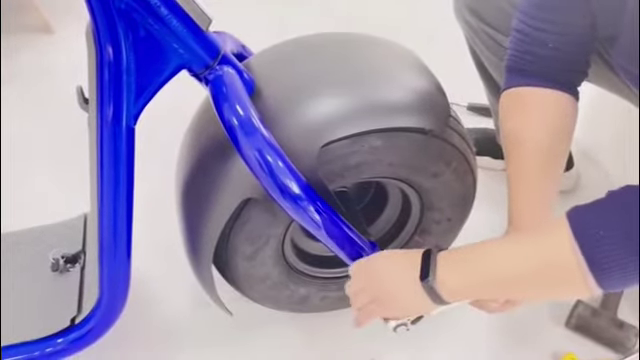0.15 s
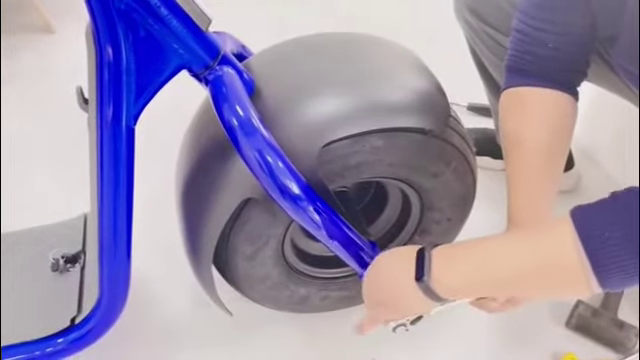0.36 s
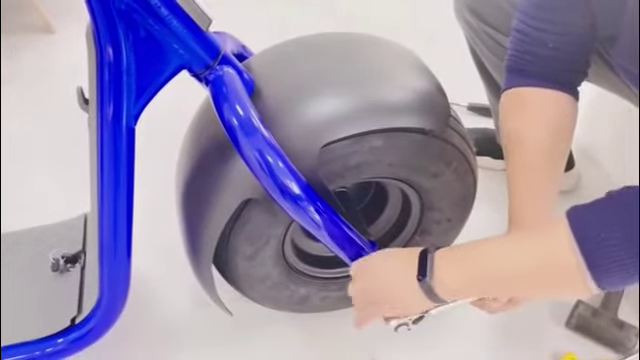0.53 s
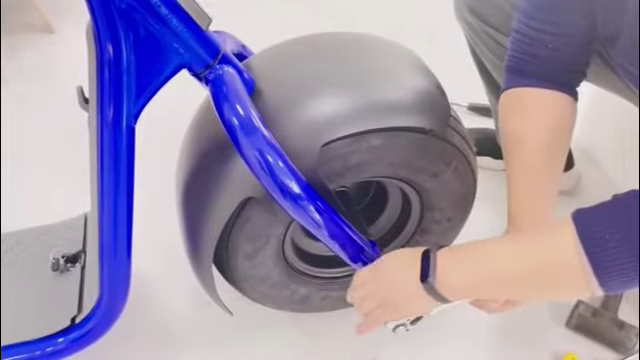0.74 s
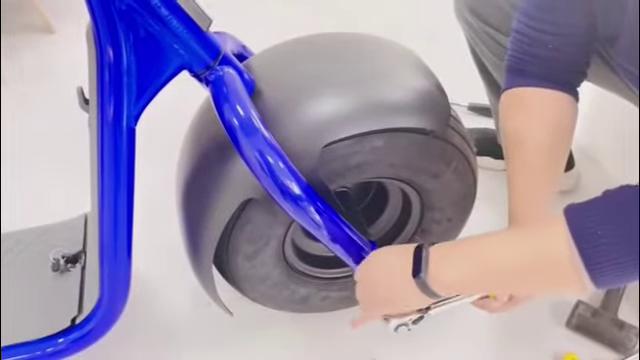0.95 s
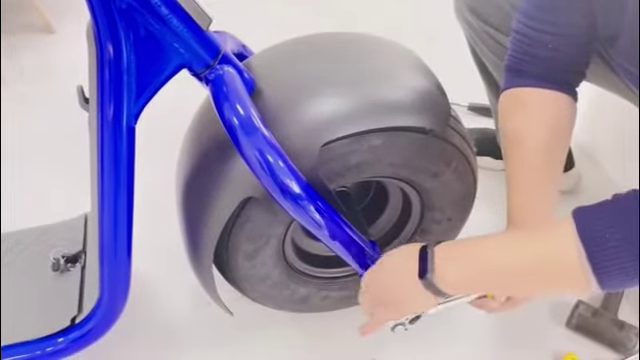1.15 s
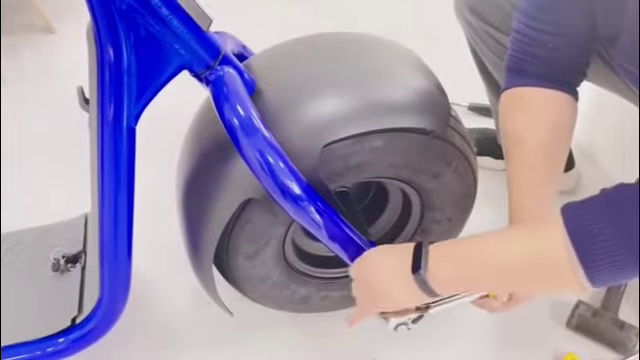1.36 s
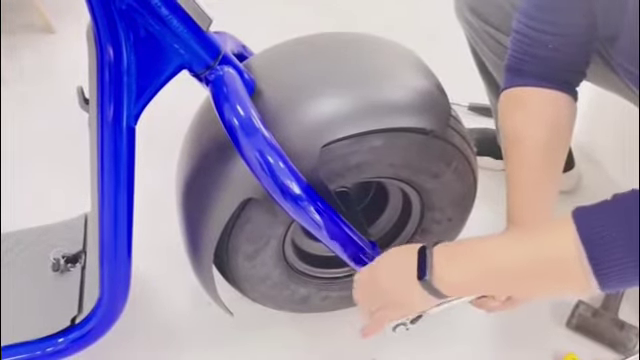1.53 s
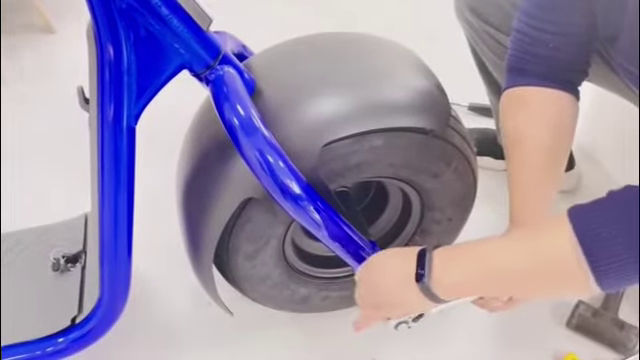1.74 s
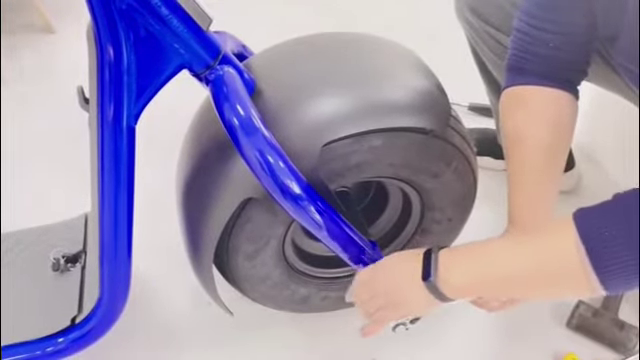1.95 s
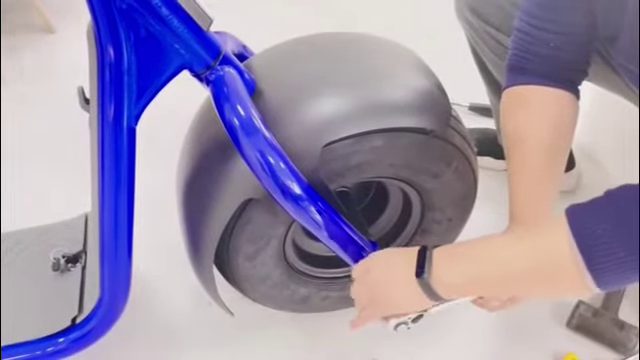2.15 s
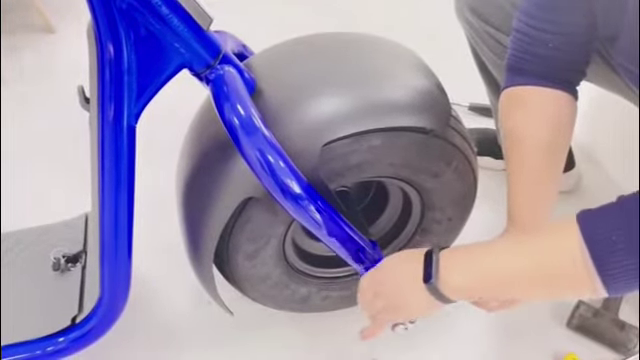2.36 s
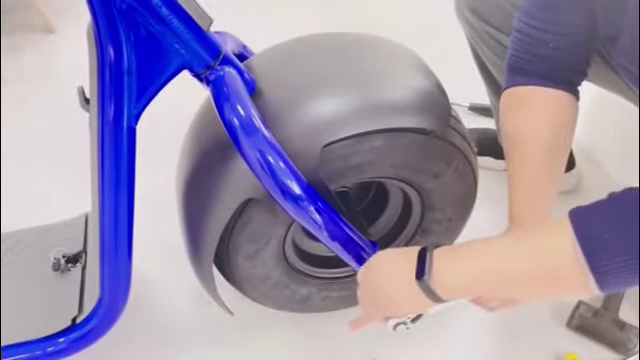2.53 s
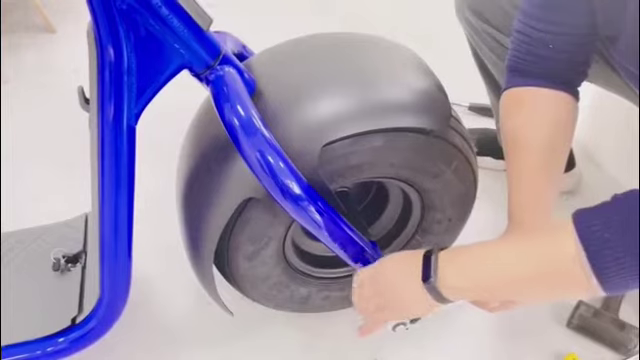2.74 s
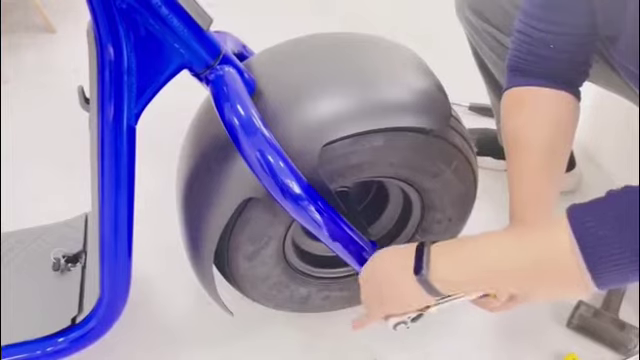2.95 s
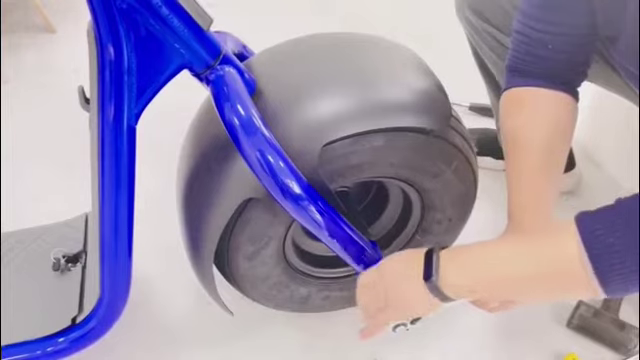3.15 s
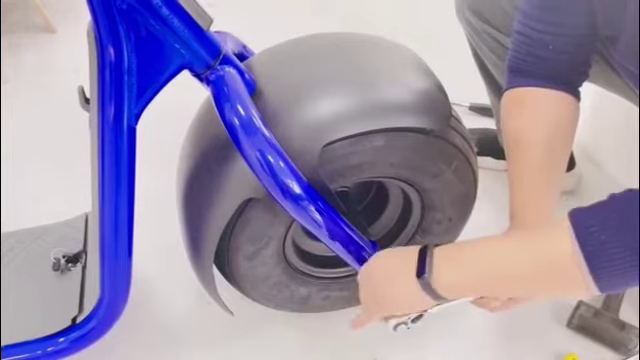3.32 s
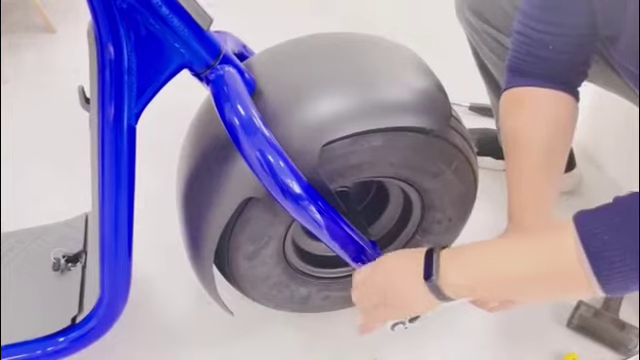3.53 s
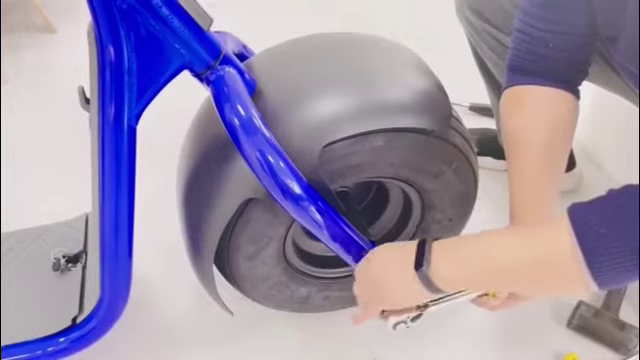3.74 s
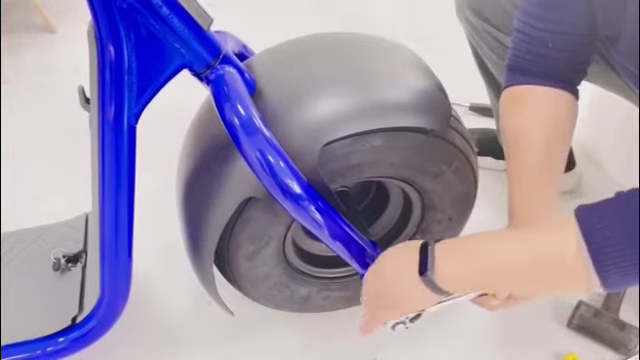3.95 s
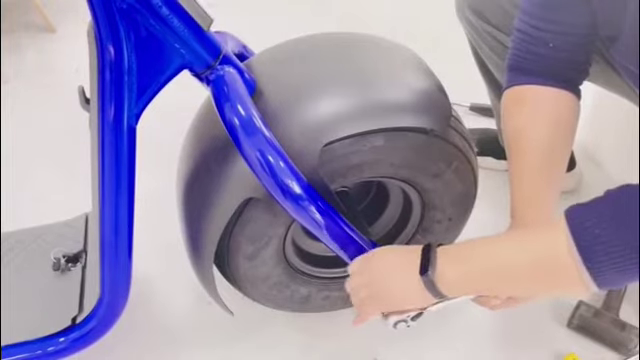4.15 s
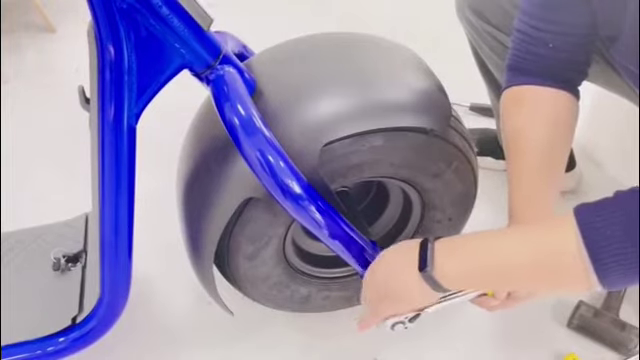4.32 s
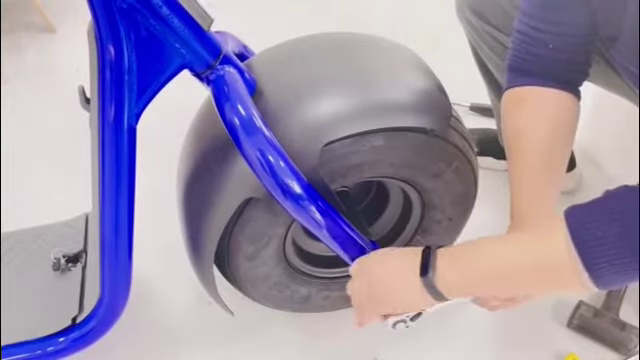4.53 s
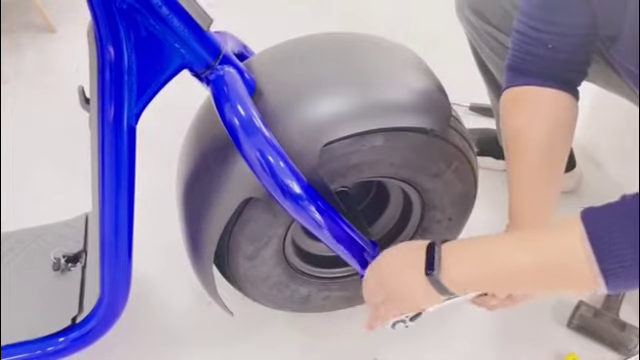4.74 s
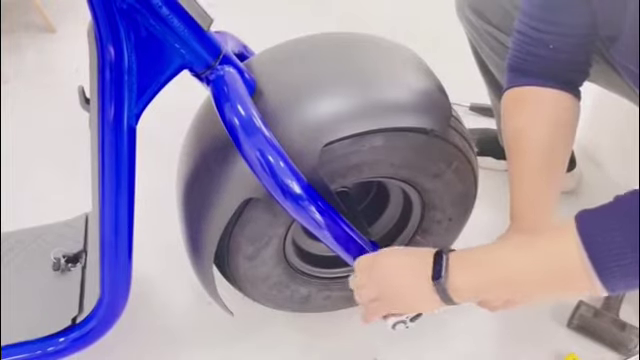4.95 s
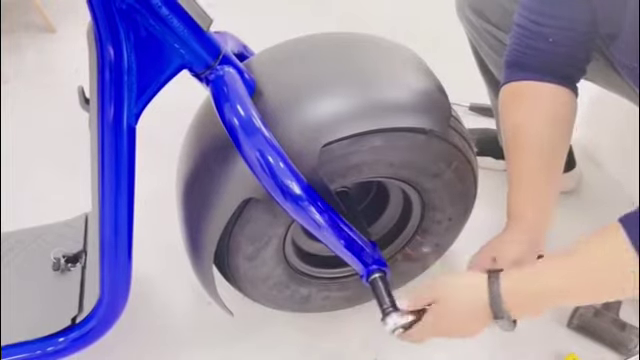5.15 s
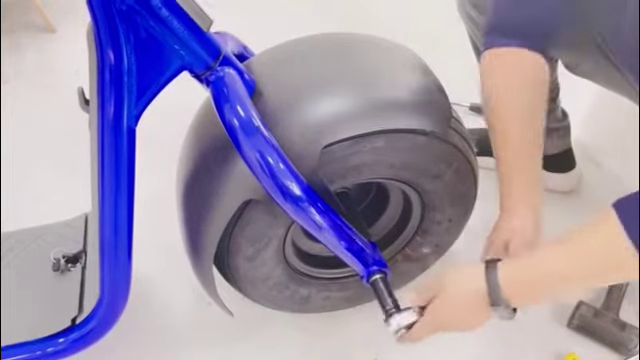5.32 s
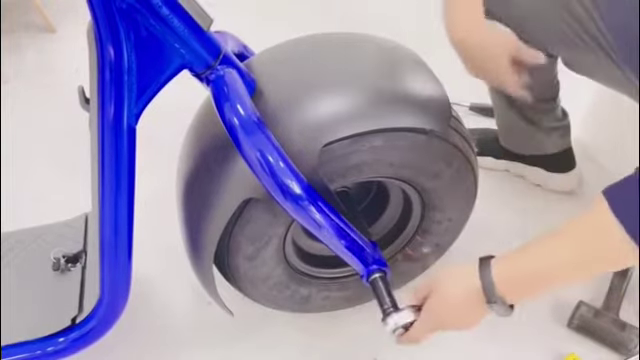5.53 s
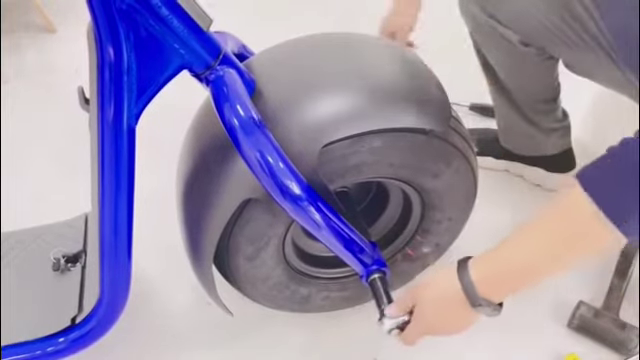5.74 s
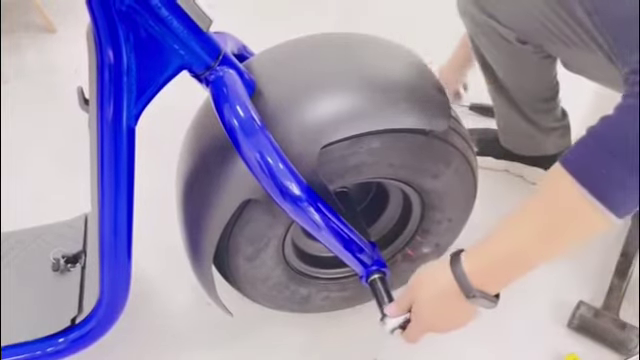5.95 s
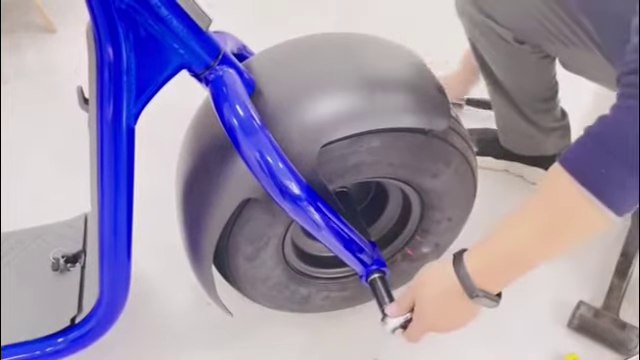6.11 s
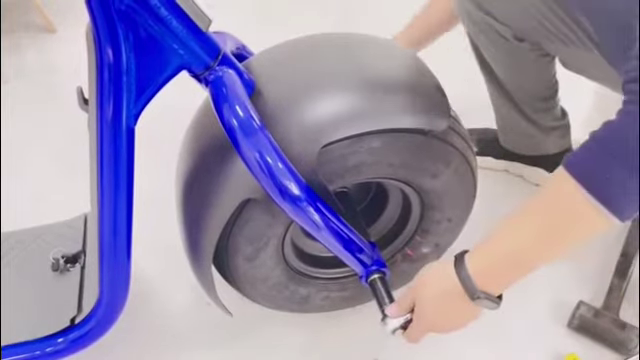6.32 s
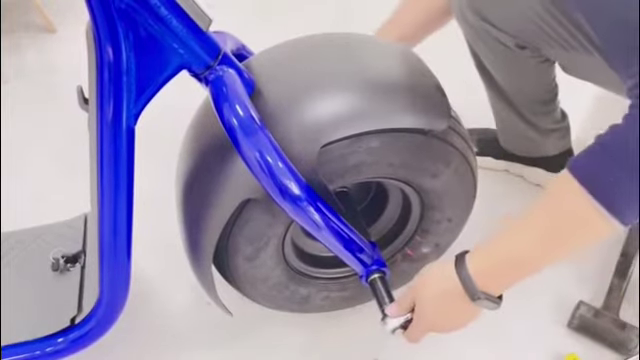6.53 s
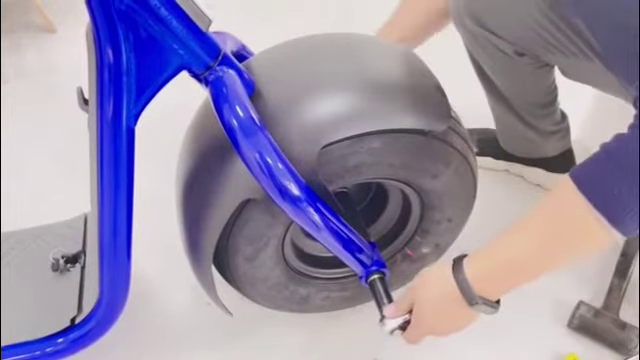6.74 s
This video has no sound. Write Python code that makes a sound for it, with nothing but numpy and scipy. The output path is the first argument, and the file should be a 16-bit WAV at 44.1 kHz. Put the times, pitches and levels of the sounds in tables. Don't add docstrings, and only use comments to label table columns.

```python
import sys
import numpy as np
from scipy import signal
from scipy.fft import rfft, irfft
from scipy.io import wavfile
from scipy.ndimage import uniform_filter1d

SR = 44100
rng = np.random.default_rng(int(sys.argv[2]) if len(sys.argv) > 2 else 0)


def makeup_ratio(level_db):
    decades = np.asarray(level_db, float) / 20
    return 10 ** decades


def log_audio(samples):
    frames = np.atleast_2d(samples).T
    limited = np.clip(frames, -1, 1)
    pcm = np.round(limited * 32767).astype(np.int16)
    wavfile.write(sys.argv[1], SR, pcm)


N = 303408
TIME = np.arange(N) / SR


def rms1(x):
    return x / np.sqrt(np.mean(x ** 2))


def on_log(table, hz):
    rows = np.array(table)
    return np.interp(np.log(np.maximum(hz, 1)), np.log(rows[:, 0]), rows[:, 1])


def band(x, lo_hz, hi_hz, order=2):
    edges = [lo_hz, min(hi_hz, .45 * SR)]
    return signal.sosfilt(signal.butter(order, edges, "band", fs=SR, output="sos"), x)


def pair(alike, size=N):
    mid, side = rng.standard_normal((2, size), dtype=np.float32)
    alike = np.clip(alike, 0, 1)
    opposite = np.array([[1], [-1]])
    return np.sqrt((1 + alike) / 2) * mid + np.sqrt((1 - alike) / 2) * side * opposite


def held_noise(hold):
    return np.repeat(rng.standard_normal(N // hold + 1), hold)[:N]


def patches(spread_db, hold=600):
    return makeup_ratio(spread_db * uniform_filter1d(held_noise(hold), size=150))


def strikes(times, db, rise_s, fall_s, lead_s):
    train = np.zeros(N)
    starts = ((times - lead_s) * SR).astype(int)
    np.add.at(train, np.clip(starts, 0, N - 1), makeup_ratio(db))
    t = TIME[:int(SR / 10)]
    swell = 1.3
    shape = np.exp(-t / fall_s) * (1 - np.exp(-(t / rise_s) ** swell))
    return np.maximum(signal.oaconvolve(train, shape / shape.max())[:N], 0)


def resonate(x, hz, width, wander):
    if not wander:
        return signal.lfilter(*signal.iirpeak(hz, hz / width, SR), x)
    pitch = hz * patches(20 / np.log(10) * wander, hold=500)
    turn = np.exp(2j * np.pi / SR * np.cumsum(pitch))
    keep = np.exp(-np.pi * width / SR)
    return 2 * (signal.lfilter([1 - keep], [1, -keep], x * turn.conj()) * turn).real


def body(push, modes, lo_hz, hi_hz, broad_db, alike, gains=(), wander=0):
    out = makeup_ratio(broad_db) * push * patches(1.36) * pair(alike)
    area = makeup_ratio(2 * broad_db) * (hi_hz - lo_hz)
    for k, (hz, width, db) in enumerate(modes):
        gain = gains[k] if k < len(gains) else 1
        drive = push * patches(2.2) * gain
        out = out + makeup_ratio(db) * resonate(drive * pair(alike), hz, width, wander)
        area += makeup_ratio(2 * db) * width * np.pi / 2
    return band(out, lo_hz, hi_hz, order=3) * np.sqrt(SR / 2 / area)


def rings(push, modes, clean=False):
    t = TIME[:SR // 2]
    tone = sum(makeup_ratio(db - 60 * t / t60) * np.sin(2 * np.pi * hz * t) for hz, db, t60 in modes)
    drive = push[None] if clean else push * pair(0.88)[:1]
    return signal.fftconvolve(drive, tone[None])[:, :N]


# (frequency [Hz], density [dB per Hz])
AIR_SPECTRUM = [(24, -36), (40, -2), (69, -1), (92, -3.5), (104, -6.5), (158, -11), (217, -15),
                (298, -16.5), (329, -19.5), (453, -27), (1620, -36), (2580, -38.5), (6240, -49),
                (9230, -53.5), (14000, -71)]


def air():
    hz = np.fft.rfftfreq(N, 1 / SR)
    colour = makeup_ratio(on_log(AIR_SPECTRUM, hz))
    mid, side = rfft(rng.standard_normal((2, N)))
    share = np.clip(hz / 800, 0, .8)
    rumble = makeup_ratio(-45) * rms1(irfft(colour * (mid + share * side * np.array([[1], [-1]])), N))
    whistle = makeup_ratio(-72.5) * patches(2.7, hold=2500) * rms1(band(pair(0.55), 2300, 2650))
    buzz = makeup_ratio(-62.0) * np.sin(2 * np.pi * 297 * TIME)
    hum = makeup_ratio(-55.0) * patches(2.1, hold=6900) * np.sin(2 * np.pi * 50 * TIME)
    return rumble + whistle + buzz + hum


# (time [s], level [dB])
RUSTLE = [
    (5.0, -104),
    (5.2, -66),
    (5.3, -85),
    (5.8, -80),
    (5.95, -60.5),
    (6.05, -65),
    (6.15, -63),
    (6.3, -69),
    (6.5, -76.5),
]


def cloth():
    grains = pair(0.38) * makeup_ratio(1.9 * rng.exponential(size=N))
    level = np.interp(TIME, *np.transpose(RUSTLE), left=-120, right=-120)
    return makeup_ratio(level) * patches(2.2, hold=1500) * rms1(band(grains, 1500, 12600))


# (centre [Hz], t60 [s], level [dB])
REVERB_BANDS = [(296, 0.72, -1), (820, 0.44, -4), (2720, 0.8, -22), (6500, 0.43, -10.5),
                (12800, 0.11, -34.5)]


def echoes():
    t = TIME[:int(.7 * SR)]
    tail = 0
    for hz, t60, db in REVERB_BANDS:
        noise = band(pair(0.36, size=len(t)), hz / 3.6, hz * 1.71)
        tail = tail + makeup_ratio(db - 60 * t / t60) * noise / np.sqrt(t60 * SR / 14)
    return tail * (1 - np.exp(-t / 0.0032))


def room(dry):
    blend_hz = 1.682
    turn, mono = np.pi * blend_hz * TIME, dry.mean(axis=0)[None]
    return sum(signal.fftconvolve(mono * share, echoes())[:, :N] for share in (np.cos(turn), np.sin(turn)))


# (time [s], level [dB], clank [dB], slap [dB], tick [dB])
TOOL_BLOWS = [
    (6.557, -13, -29, -15, -8),
    (6.653, -13, 0, -10, -9.5),
    (6.721, -34, 3.5, -6, -76),
    (6.735, -25.5, -11, -26, -31),
    (6.806, -50, 0, -9, -32),
    (6.832, -35.5, -6, -19, -25),
]
# (time [s], level [dB])
STEEL_TOUCHES = [
    (5.974, -36.5),
    (6.111, -30.5),
]
# (frequency [Hz], width [Hz], level [dB])
TOOL_MODES = [(610, 49, -7.5), (890, 70, -6), (1030, 42, -9), (1352, 57, -3.5), (1990, 110, -2),
              (2500, 260, -16), (2840, 820, -0.5), (4500, 450, -20)]
# (frequency [Hz], level [dB], t60 [s])
BLOW_RING = [(611, -41.5, 0.15), (626, -53, 0.12), (820, -35, 0.23), (890, -34, 0.2), (1100, -48, .13),
             (1130, -41, 0.14), (1410, -48, 0.16), (1660, -44, .07), (2330, -48, .06)]
# (frequency [Hz], level [dB], t60 [s])
EDGE_RING = [(1442, -27, 0.11), (1936, -28, 0.056), (2020, -37, .04), (2520, -42, .04), (3000, -38, .04)]
# (rise [s], fall [s], lead on the peak [s])
BLOW_SHAPE = (0.0003, 0.015, 0.00087)


def second_tool():
    s, db, clank_db, slap_db, tick_db = np.transpose(TOOL_BLOWS)
    low = body(strikes(s, db - 5.5, *BLOW_SHAPE), TOOL_MODES[:4], 510, 2300, -11.5, 0.72)
    low = low + rings(strikes(s, db, 0.00005, 0.0001, 0.00052), BLOW_RING, clean=True)
    edge = strikes(s, db + clank_db + 3.0, .0004, 0.012, .0005)
    clank = body(edge, TOOL_MODES[4:5], 1700, 2580, -11.0, 0.87) * makeup_ratio(-5.5)
    edge_tap = strikes(s, db + clank_db, 0.00003, 0.00006, 0.00064)
    clank = clank + rings(edge_tap, EDGE_RING, clean=True) * makeup_ratio(8)
    flat = strikes(s, db + slap_db + 8.5, 0.00019, 0.0073, 0.00086)
    slap = body(flat, TOOL_MODES[5:], 2500, 5800, -10.0, 0.37)
    tick = band(strikes(s, db + tick_db, 0.00016, 0.0033, 0.00082) * pair(0.6), 5200, 10700)
    thud = band(strikes(s, db - 12.0, 0.0015, 0.089, 0) * pair(1.0), 94, 240)
    loose = strikes(s, db, 0.0066, 0.045, 0) * pair(0.27) * patches(1.7, hold=300)
    rattle = band(loose, 550, 4900) * makeup_ratio(-17.0)
    s, db = np.transpose(STEEL_TOUCHES)
    graze = strikes(s, db - 17.0, 0.00031, 0.022, 0.00037)
    touch = body(graze, [(2450, 830, 0)], 1200, 10700, -12.0, 0.32)
    return low + clank + slap + tick + thud + touch + rattle


# (time [s], frequency [Hz], level [dB], t60 [s])
LOOSE_STEEL = [(1.007, 1300, -39, .08), (1.164, 1150, -22, .074), (1.712, 1100, -28, .05),
               (1.95, 1080, -43, .064), (4.825, 1060, -22, .045), (5.483, 4340, -52, .3),
               (5.483, 4345, -29, .018), (5.489, 580, -33, .08), (5.581, 5080, -23, .012),
               (5.584, 4370, -56, .2), (5.586, 594, -32, .1), (5.657, 4400, -48, .2),
               (5.658, 4370, -25, .025), (5.658, 1150, -32, .04), (5.664, 4530, -50, .22),
               (5.67, 4330, -51, .24), (5.79, 596, -39, .076), (5.795, 900, -40, .14),
               (5.795, 750, -42, .12), (6.113, 2450, -63, .44), (6.56, 1090, -22.5, .15),
               (6.562, 580, -25, .15), (6.655, 596, -25, .16), (6.66, 1300, -23, .11),
               (6.668, 805, -28, .088), (6.72, 1433, -37, .22)]


def free_rings():
    out = np.zeros((1, N))
    for s, hz, db, t60 in LOOSE_STEEL:
        t = np.maximum(TIME - s, 0)
        decay = makeup_ratio(np.maximum(db - 60 * t / t60, -200))
        out += decay * (1 - np.exp(-t / 0.0016)) * np.sin(2 * np.pi * hz * t)
    return out


# (time [s], level [dB], bright part [dB], deep part [dB])
SOCKET_KNOCKS = [(0.17, -45, 6.5, 7), (0.706, -39, -4, -1), (1.007, -32.5, -5, -6), (1.414, -35.5, 6, 1.5),
                 (1.95, -37, 3.5, -4.5), (2.289, -45, 1, -8), (2.659, -38, 2, -2), (3.047, -35, 2, 1),
                 (3.109, -63, -13, -9), (3.158, -45, -6, -8), (3.434, -33.5, -1, -3), (3.477, -30, -9, -5),
                 (3.514, -33.5, -26, -2), (3.558, -35.5, -2, -6), (3.782, -35.5, -1, -6),
                 (3.937, -43, 11, -4), (4.275, -32, -5, -4.5), (4.533, -35, 1, -5.5),
                 (4.666, -32.5, -6, -9), (4.949, -35, 2, -10), (5.123, -46, -14, -5.5),
                 (5.205, -47, -12.5, 2), (5.788, -33.5, -6, 1.5), (6.015, -46, -20, -15)]
# (frequency [Hz], width [Hz], level [dB])
FRAME_MODES = [(583, 62, -4), (792.5, 31, -4.5), (1070, 121, 1), (1411, 28, -0.5), (1928, 90, -5),
               (2095, 25, -2), (2474, 175, -11.5)]


def knocks():
    s, db, bright_db, deep_db = np.transpose(SOCKET_KNOCKS)
    deep_push = strikes(s, db + deep_db - 3.0, 0.0011, 0.0087, 0)
    deep = body(deep_push, FRAME_MODES[:1], 417, 900, -15.5, 0.9)
    dull_push = strikes(s, db - 5.0, 0.00043, 0.0066, 0.0011)
    dull = body(dull_push, FRAME_MODES[1:4], 720, 1590, -15.5, 0.83)
    bright_push = strikes(s, db + bright_db - 11.0, 0.00036, 0.0084, 0.0013)
    bright = body(bright_push, FRAME_MODES[4:], 1000, 2640, -17.5, 0.62)
    hum = band(strikes(s, db + deep_db - 14, 0.0065, 0.024, 0) * pair(0.63), 454, 1000) * makeup_ratio(12.5)
    return deep + dull + bright + hum


# (time [s], wrench head ring [dB], lowest tube mode [dB], middle tube mode [dB])
HAND_GRIP = [(0, -2, -6, -7.5), (.3, 4.5, 2, -6.5), (.74, 7.5, 5, 0.5), (1.14, 1.5, -1.5, 2),
             (1.54, 2, -8, -1.5), (1.98, 3.5, 4, 0.5), (2.39, 4.5, -3.5, 0), (2.79, 4.5, -4, -3),
             (3.16, 5, 0.5, 1), (3.55, 4, 2.5, 1.5), (3.931, 2.5, 0, -2.5), (4.31, 3.5, 2, 1),
             (4.691, 5, 0.5, 1), (5.4, 5, 3.5, -1.5)]


def grip_at(t):
    rows = np.array(HAND_GRIP)
    latest = np.searchsorted(rows[:, 0], t, side="right") - 1
    return rows[np.maximum(latest, 0)].T[1:]


# (rise [s], fall [s], lead on the peak [s])
BOUNCE_SHAPE = (0.003, 0.0073, 0)


def chatter(s, db, rough_db):
    return strikes(s, db, *BOUNCE_SHAPE) * uniform_filter1d(makeup_ratio(rough_db * held_noise(40)), size=20)


def ping(push, hz, wander, drift_hz):
    steps = rng.standard_normal((3, N))
    apart = uniform_filter1d(steps[1:], size=200, axis=1) * 7
    pitch = hz + drift_hz * held_noise(900)
    phase = np.cumsum(2 * np.pi * pitch / SR + wander * steps[0])
    return push * np.cos(phase + apart)


# (time [s], pawl level [dB], frame minus pawl [dB], crack minus pawl [dB])
SWINGS_1_TO_4 = [(0.0085, -49, -11, 5), (0.0167, -27, -3, -5), (0.0268, -26, -1, -4),
                 (0.0365, -29.5, 1.5, -2), (0.0487, -27, -2, 4), (0.067, -30, 1, 3), (0.3337, -29, 0.5, -5),
                 (0.3498, -31, -1.5, -2), (0.363, -29, -0.5, 3.5), (0.3835, -25, -4, -7.5),
                 (0.4003, -29, 2, -2.5), (0.4116, -31.5, -0.5, 5), (0.4314, -28, -3.5, -2.5),
                 (0.4394, -26.5, -6.5, -5), (0.4496, -26, -1, 1), (0.4583, -29.5, -2, -2),
                 (0.4669, -23.5, -2.5, -6.5), (0.48, -27, -8.5, 1), (0.4958, -30.5, 1.5, -4),
                 (0.5117, -31, -1, -0.5), (0.775, -32, 1, 2), (0.7893, -29.5, -8.5, 3.5),
                 (0.798, -27, -2, -16), (0.8124, -28.5, -7, 2), (0.8207, -25, -7.5, -4),
                 (0.8356, -21.5, -10, -13), (0.8439, -24.5, -7, -6.5), (0.8595, -24.5, 1, -2),
                 (0.8787, -30.5, 5.5, 0), (0.8947, -58, -3.5, -15), (0.9057, -28, -8, -4),
                 (0.9158, -29, -2.5, 0), (0.9227, -54, -0.5, 2), (1.1667, -29.5, 1.5, 0),
                 (1.1792, -30, -5, -1.5), (1.1885, -25.5, 0, -9.5), (1.1972, -31, -12, -8),
                 (1.2035, -35.5, 0.5, -2.5), (1.2158, -26, -2, -0.5), (1.2385, -27, -2, -1.5),
                 (1.2476, -25, 0, -9), (1.2559, -27, -6, -4.5), (1.2704, -30.5, 2.5, -8.5),
                 (1.2792, -36.5, -7, 12), (1.2915, -32, -3, 2.5), (1.3237, -30, 1.5, 5)]
SWINGS_5_TO_7 = [(1.564, -30, 2, -1), (1.575, -30, 4, -7), (1.592, -29, 3, -0.5), (1.6245, -28, 1, -5),
                 (1.6459, -29, 2.5, 2.5), (1.6626, -30.5, 2, -9), (1.6757, -27, -1, 0),
                 (1.6832, -34, 5.5, 11), (1.692, -25.5, -1.5, -7), (1.704, -29.5, -6, 0.5),
                 (1.713, -29, 1, 4), (1.723, -28.5, -0.5, -3), (1.74, -29, -5.5, -4),
                 (2.0047, -27, -7.5, -5), (2.029, -28.5, -6, -2.5), (2.0378, -28, -5.5, 4),
                 (2.048, -27, -7, -2), (2.053, -44, 1, 0.5), (2.071, -26, -2.5, 1),
                 (2.081, -24.5, -3.5, -3.5), (2.0892, -26, -6.5, -5), (2.103, -27, -7, -3),
                 (2.1102, -28, 6, 5.5), (2.1346, -31.5, 2, 1.5), (2.144, -30, -1, -14),
                 (2.1628, -26.5, -5, -4), (2.4112, -27.5, -3.5, -4.5), (2.419, -27.5, -2, -8.5),
                 (2.4293, -26.5, -3, -10), (2.452, -29, -2.5, -4.5), (2.463, -28.5, 4.5, 0),
                 (2.4756, -29.5, 0, -5), (2.484, -28.5, 5.5, -2), (2.4932, -27.5, 1.5, -1),
                 (2.505, -25.5, 0, 0), (2.5176, -25, -6, 0), (2.5328, -23, -3, -4.5),
                 (2.5417, -27.5, -6, -3), (2.561, -35.5, 5, 4)]
SWINGS_8_TO_10 = [(2.8192, -28, 2, -5.5), (2.8297, -26, -11, -8), (2.8459, -31, 3, 3),
                  (2.8627, -23, -5.5, -6.5), (2.873, -27.5, 0, 0), (2.8838, -25, 0.5, 0),
                  (2.896, -24.5, -0.5, 0.5), (2.9077, -27, -0.5, 0), (2.9196, -31, 4, 4.5),
                  (2.9649, -26, -9.5, -2), (3.1922, -29, -1, -3), (3.201, -24.5, -6.5, -3.5),
                  (3.2102, -29, -7, -2), (3.2214, -33, 8.5, 4), (3.239, -25, 0, -1), (3.25, -30, 7.5, -3),
                  (3.2592, -25, -1, -2), (3.27, -28.5, 2.5, 3.5), (3.277, -33.5, -9, 5.5),
                  (3.2838, -38.5, 6, 7), (3.2915, -26.5, -0.5, -2), (3.3045, -27.5, -6, -12),
                  (3.3145, -30.5, 0, 1.5), (3.3448, -33.5, 1.5, 4.5), (3.581, -23.5, -4.5, -7),
                  (3.5893, -32, -5.5, -6), (3.6013, -23.5, -8, -7), (3.615, -29, -3, -2),
                  (3.6264, -29.5, -0.5, 0), (3.6362, -30.5, 4, 4.5), (3.6483, -25, -10, -4),
                  (3.6566, -27.5, -6, -1), (3.6655, -25, -3.5, -2), (3.674, -24.5, 2, -5),
                  (3.6848, -23.5, -2.5, -1), (3.7057, -29, -2.5, -1.5)]
SWINGS_11_TO_13 = [(3.9574, -26, -4.5, -2), (3.9662, -30, 0, -5), (3.9794, -31.5, 0.5, 2),
                   (3.9871, -42, 3, 3), (3.997, -33, 3, 7), (4.006, -34, 3, 6), (4.0187, -26, -1, -6),
                   (4.03, -25, 4.5, -1), (4.039, -32, -1, 3), (4.046, -33.5, 1.5, 7),
                   (4.0543, -30, -4.5, -1), (4.0615, -33.5, 5, -3), (4.066, -30, 5.5, -10),
                   (4.0727, -31.5, 4.5, 0), (4.0834, -27.5, -12, -2.5), (4.3364, -29, -3, -2),
                   (4.346, -23.5, -9.5, -6), (4.3567, -29.5, 0, 0.5), (4.372, -23, -8, -5),
                   (4.386, -27.5, -4.5, -5), (4.396, -28, -3, -1), (4.4092, -23, -19, -7),
                   (4.4224, -29.5, 4, -0.5), (4.436, -31.5, -0.5, 1), (4.4436, -34, 2.5, 0),
                   (4.455, -26, -3, -4), (4.4783, -31.5, 1, 0.5), (4.7258, -27.5, -8, -2),
                   (4.746, -29.5, 0, 4), (4.7573, -32.5, 0.5, 3), (4.7663, -27.5, -10, 2),
                   (4.775, -26.5, -6, -4), (4.7877, -22.5, -1.5, -4), (4.7994, -25.5, -3.5, -1),
                   (4.81, -22, -7, -3.5), (4.8268, -23.5, 2.5, 0)]
# (time [s], pawl [dB], frame [dB],
# crack [dB])
SLACK_TEETH = [
    (.002, -24.5, 2, -2),
    (1.555, -45, 5, -10),
    (3.947, -43, 0, -7.5),
    (4.329, -63, -4, -14),
    (2.806, -49.5, 6, -6),
    (3.172, -50.5, 13, -10),
    (3.5694, -43, -2, -21),
    (4.7056, -48, 3, -22),
    (4.8847, -54.5, 0, 8),
]
# (time [s], pawl [dB], frame [dB], crack [dB])
FINGER_TEETH = [
    (5.451, -59, -8, -9),
    (5.4822, -25.5, -1.5, -4.5),
    (5.5835, -32.5, 3, 4),
    (5.6586, -26, -4, -2.5),
    (5.681, -58, 9, -21),
]


def teeth():
    swings = [SWINGS_1_TO_4, SWINGS_5_TO_7, SWINGS_8_TO_10, SWINGS_11_TO_13]
    return np.vstack(swings + [SLACK_TEETH, FINGER_TEETH]).T


# (frequency [Hz], width [Hz], level [dB])
PAWL_MODES = [(3282, 203, -3), (4230, 83, 3), (4354, 96, -2), (5840, 630, -7)]
# (frequency [Hz], width [Hz], level [dB])
CRACK_MODES = [(7400, 360, -30.5), (8440, 230, 1.5), (8800, 250, 3), (10260, 820, -10), (11800, 5800, -3.5)]
# (frequency [Hz], level [dB], t60 [s])
SOCKET_RING = [(4130, -29, .15), (4200, -32.5, 0.17), (4330, -23, 0.19), (4460, -30, .2),
               (4430, -32.5, .18), (4600, -35, .18), (8530, -41.5, .067)]
# (rise [s], fall [s], lead on the listed time [s])
DROP_SHAPE = (0.0018, 0.002, 0.0028)
PING_SHAPE = (0.0034, 0.0025, 0.0026)


def ratchet():
    s, db, frame_db, crack_db = teeth()
    head, tube1, tube2 = makeup_ratio(grip_at(TIME))
    by_fingers = TIME > FINGER_TEETH[0][0]
    in_palm = TIME < FINGER_TEETH[0][0]

    crack = strikes(s, db + crack_db + 0.5, *DROP_SHAPE) + chatter(s, db + crack_db - 9.0, 1.4)
    steel = body(crack, CRACK_MODES, 5100, 16200, -2.4, 0.18, (1, head, head))
    pawl = strikes(s, db - 2.5, *DROP_SHAPE) + chatter(s, db - 13.0, 1.8)
    muted = makeup_ratio(-29 * by_fingers)
    steel = steel + body(pawl, PAWL_MODES, 1820, 5760, -15.0, 0.53, (muted, muted))

    main_hz = 4300 + 58.9 * by_fingers
    steel = steel + ping(strikes(s, db - 1.5, *PING_SHAPE), main_hz, 0.12, 84.7)
    high_push = strikes(s, db + crack_db - 13.5, *PING_SHAPE)
    steel = steel + head * patches(3.1) * ping(high_push, 8700, 0.1074, 150.6)
    tails = makeup_ratio(-31.0) * patches(3.0, hold=500) * rings(pawl * in_palm, SOCKET_RING)

    thump = strikes(s, db + frame_db - 3.5, 0.0029, 0.0069, 0.0026)
    tube_gains = (tube1, 1, makeup_ratio(-2) * tube2)
    return steel + tails + body(thump, FRAME_MODES, 496, 2780, -14.5, 0.83, tube_gains, wander=0.029)


# (frequency [Hz], left minus right [dB])
LEFT_LEAN = [(60, 3.5), (110, -4), (200, 4), (380, 3), (700, 1), (1290, 0.5), (2380, 2.5), (4400, 4),
             (8120, 0.5), (15000, -0.5)]


def scene():
    hits = ratchet() + knocks() + free_rings() + second_tool()
    lean = makeup_ratio(on_log(LEFT_LEAN, np.fft.rfftfreq(N, 1 / SR)) / 2)
    hits = irfft(rfft(hits + room(hits)) * [lean, 1 / lean], N)
    return hits + cloth() + air()


def roll_off(x):
    return signal.sosfilt(signal.butter(12, 16510, fs=SR, output="sos"), x)


def record(dry):
    x = signal.sosfilt(signal.butter(3, 34, "high", fs=SR, output="sos"), dry)
    x = signal.sosfilt(signal.ellip(8, .3, 80, 15600, fs=SR, output="sos"), x)
    return roll_off(x)


dry = scene()
out = record(dry)
log_audio(out)
```